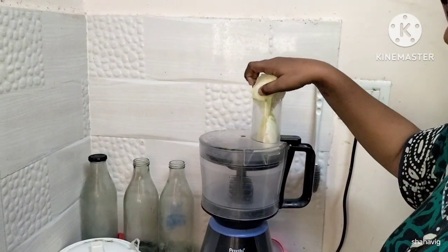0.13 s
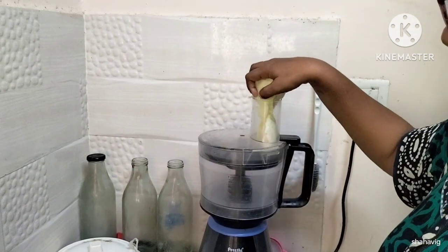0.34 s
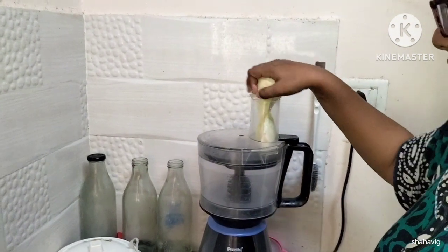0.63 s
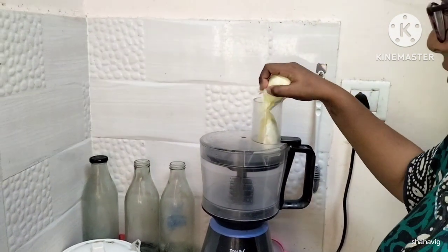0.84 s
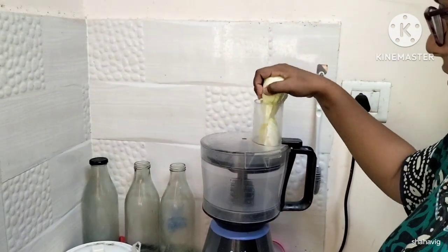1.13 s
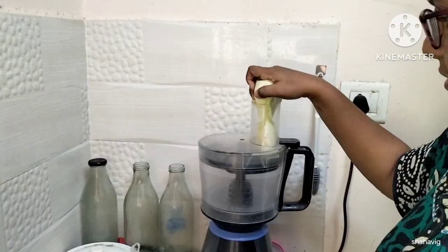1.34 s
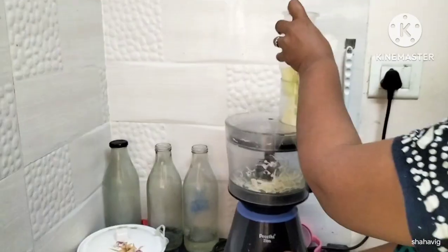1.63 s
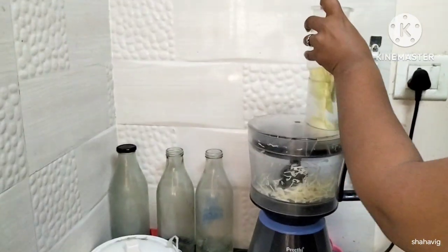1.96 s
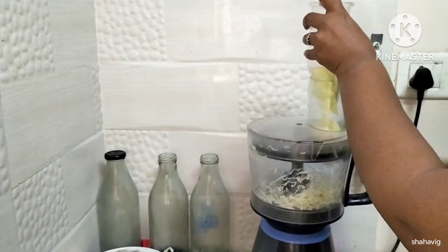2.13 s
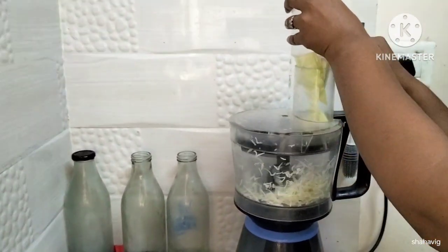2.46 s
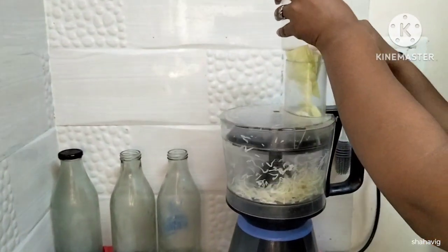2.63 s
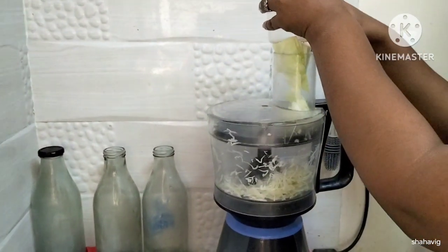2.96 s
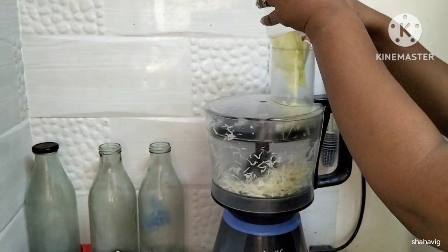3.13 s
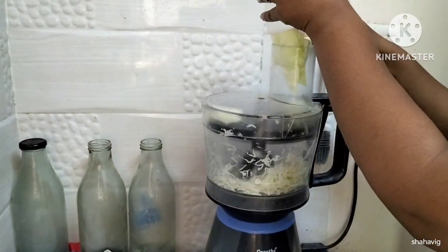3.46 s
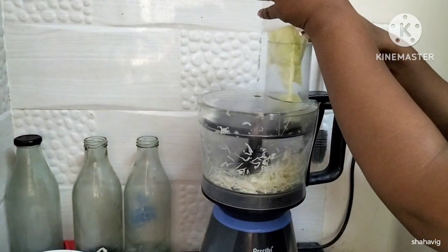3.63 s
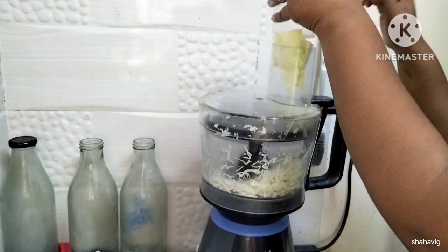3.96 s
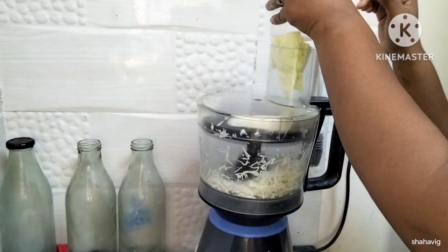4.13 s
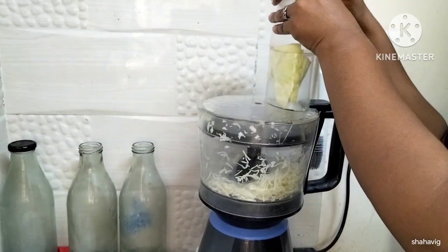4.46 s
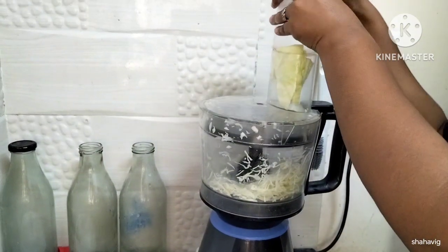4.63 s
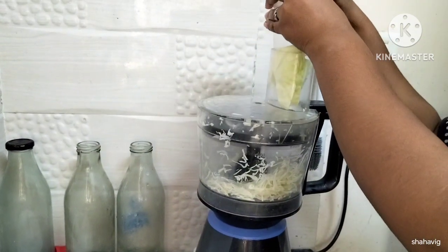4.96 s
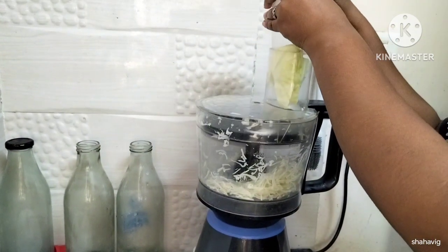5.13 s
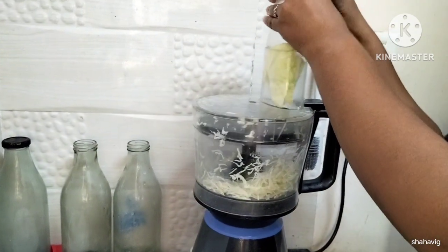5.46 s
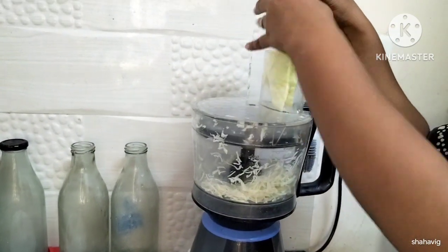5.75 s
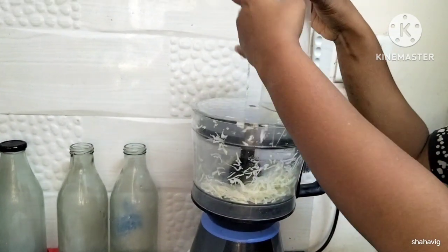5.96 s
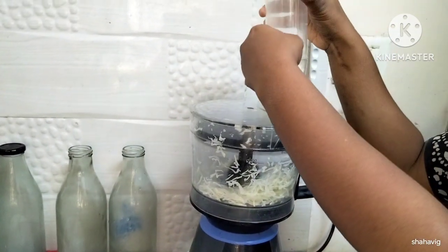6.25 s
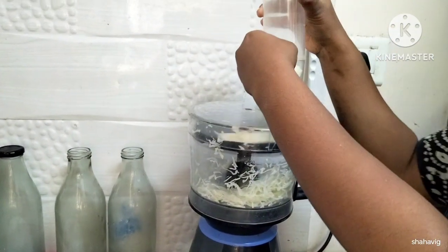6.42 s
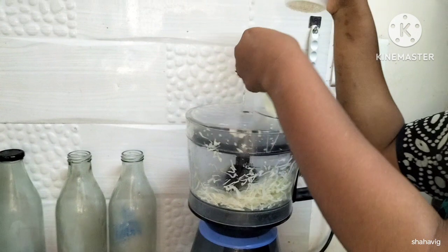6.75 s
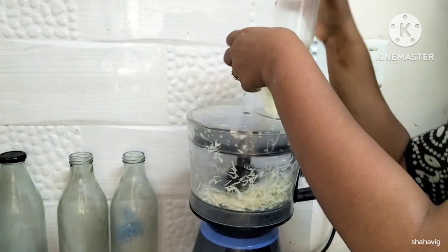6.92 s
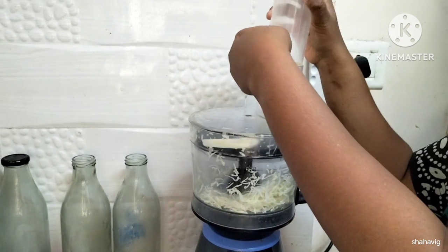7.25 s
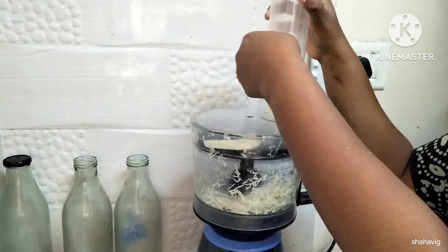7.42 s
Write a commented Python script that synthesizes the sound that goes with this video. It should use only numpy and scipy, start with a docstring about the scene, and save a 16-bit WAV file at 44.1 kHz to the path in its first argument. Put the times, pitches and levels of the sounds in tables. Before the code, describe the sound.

A close, mono kitchen scene with hard tiled walls and a faint dull room murmur. From 0 to 1.2 s there are only quiet handling sounds: brief crackly rubs of cabbage in a plastic feed tube, soft low bumps on the counter and light taps on the bowl. Around 1.3 s a stronger rub and a quick flurry of ringing plastic clacks. At 1.5 s the food processor cuts in abruptly with sharp clicks and a bright housing ring, far louder, its pitch creeping up slightly over the next couple of seconds. It then holds a high, slightly wavering whine around 2.6 kHz over fan air and harsh, rapidly pulsing gear hiss. Crisp shredding thickens at about 1.7-2, 2.6-3.2, 3.7-4.5, 5-5.8 and 7.2 s. Dull thuds come near 4.1 and, fainter, 6.5 s; the noise dips briefly near 6.2 s. The motor is still running at the end, about 7.6 s.

```python
"""Food processor shredding cabbage

Mono, close by, on a tiled kitchen counter. Cabbage rubs and bumps in the plastic feed tube (coloured grains
and noise), plastic clacks (struck modes), then the running motor is heard abruptly and creeps up to speed.
It whines on multiples of its shaft rate (sines) over fan air and gear hiss (shaped noise),
a ringing housing (moving resonance) and shredding leaves (grains).
"""
import sys
import numpy as np
from scipy import signal
from scipy.fft import rfft, irfft, next_fast_len
from scipy.io import wavfile

SR = 44100
rng = np.random.default_rng(int(sys.argv[2]) if len(sys.argv) > 2 else 0)


def unload_audio(sound):
    """Save the sound as a 16-bit wav file, at the path given as the first command line argument."""
    columns = np.transpose(np.atleast_2d(sound))
    # keep every value between -1 and 1, then stretch to whole-number steps
    steps = np.round(np.clip(columns, -1, 1) * 32767)
    wavfile.write(sys.argv[1], SR, steps.astype(np.int16))


N = 334719
TIME_S = np.arange(N) / SR

# Room murmur spectrum: (frequency [Hz], relative level [dB])
ROOM_SPECTRUM = [(20, -38), (40, -27), (65, -14), (95, -7.5), (140, -6), (310, 3.5), (380, -1), (900, -1.5),
                 (1700, -7), (3900, -10), (6500, -22.5), (8000, -42), (12000, -46), (15000, -48)]
ROOM_DB = -52
CUTOFF_HZ = 15500

# Cabbage rub spectrum: (frequency [Hz], relative level [dB])
RUB_SPECTRUM = [(1000, -35), (2000, -13.5), (2900, -5), (4200, -3), (5800, -7), (6900, -15.5), (8000, -31),
                (9500, -36), (12000, -34), (15000, -40)]
# Feed tube resonances: (frequency [Hz], width [Hz], lift [dB])
TUBE_MODES = [(2270, 80, 6), (3080, 82, 3), (3550, 120, 4.3), (4100, 130, 8.5), (4570, 130, 4.3),
              (11900, 400, 9)]
# Strokes of cabbage in the tube: (start [s], length [s], strength [dB])
RUB_STROKES = [(0.01, .03, -57), (0.077, 0.029, -50), (0.224, 0.052, -48.5), (0.282, 0.053, -49),
               (0.436, 0.04, -55), (0.647, 0.091, -55), (0.804, .13, -54.5), (1.115, .04, -59),
               (1.271, 0.036, -39.5), (1.35, .15, -53.5)]
RUB_ATTACK_S, RUB_RELEASE_S = 0.01, 0.023  # time constants
# Soft bumps on the counter: (time [s], strength [dB], decay [s])
BUMPS = [(.10, -49, 0.033), (.25, -44, 0.049), (.3, -46, .03), (.475, -41, .012), (1.38, -47, 0.013)]
# Plastic clacks: (time [s], strength [dB], decay [s])
CLACKS = [(1.277, -41, 0.014), (1.291, -46, 0.016), (1.367, -56, .02), (1.44, -54, .025)]
# Clack and tap spectrum: (frequency [Hz], relative level [dB])
CLACK_SPECTRUM = [(470, -40), (1100, 1), (1500, -25), (2050, -18), (2500, -2), (4000, -6), (6800, -20),
                  (8000, -28), (9500, -35), (12000, -34), (15000, -35)]
# Plastic bowl modes: (frequency [Hz], relative level [dB], t60 [s])
BOWL_MODES = [(1060, -7, .15), (2220, 2, .14), (3200, -9, .14), (3555, 2, .16), (3830, -4, .13),
              (4150, -2, 0.09), (4820, -3, .09), (5230, -6, .14), (6850, -10, 0.11), (12100, -26, .1)]
# Light taps on the bowl: (time [s], strength [dB], decay [s], resonance [Hz])
TAPS = [(.035, -44, .014, 4120), (.221, -44, 0.011, 4780), (.247, -45, .012, 4700),
        (.578, -45.5, 0.011, 2300), (.823, -48, .008, 3500)]

# Motor speed: (time [s], shaft rate [turns/s])
SHAFT_SPEED = [(1.5, 82.18), (1.75, 84.02), (2.1, 85.1), (2.5, 85.6), (2.8, 86.18), (3.3, 86.7),
               (4.1, 87.06), (4.85, 87.32), (5.4, 86.98), (5.9, 87.26), (6.2, 87.08), (6.6, 87.42),
               (7.0, 87.15), (7.59, 87.26)]
ONSET_S = 1.5012
# Sharp clicks around the abrupt onset: (time [s], height before the low-pass [full scale])
ONSET_CLICKS = [(1.5012, 0.17), (1.5053, 0.18), (1.526, 0.2)]
# Extra housing ring just after the onset, and the time constant of its dying away
EARLY_RING_DB, SETTLE_S = 9.5, .14
# Slow change of the running noise: (time [s], relative level [dB])
NOISE_LEVEL = [(1.5, -2.5), (1.8, 0), (3.2, 1), (4.1, 0.67), (4.7, -0.1), (5.8, -0.1), (6.6, 0.3),
               (7.59, 0.5)]
# Brief dip of the running noise
DIP_START_S, DIP_LENGTH_S, DIP_EDGE_S, DIP_DB = 6.165, 0.14, .022, -4.5
# Base levels, before the slow change and dip
AIR_DB, HISS_DB, RING_DB = -31, -20.5, -28
# Fan air spectrum: (frequency [Hz], relative level [dB])
AIR_SPECTRUM = [(15, -48), (30, -51), (80, -31.5), (150, -18), (225, -13), (264, -6), (346, -10.5),
                (452, -6.5), (735, -6), (830, -3.5), (1220, -2), (1940, -5), (2200, 2.5), (2900, -39)]
# Base resonances in the air noise: (frequency [Hz], width [Hz], lift [dB])
BASE_MODES = [(149, 7.3, 2.5), (215, 12, 6), (242, 13.4, -15.5), (290, 59, 8.5), (475, 50, 5.5),
              (926, 130, 5.5), (1170, 46, -6.5), (1738, 51, 7.5)]
# Gear hiss spectrum: (frequency [Hz], relative level [dB])
HISS_SPECTRUM = [(300, -60), (1500, -41), (2100, -10.5), (2450, 3.5), (2900, 3), (3500, 3), (3900, -0.6),
                 (5300, 0.1), (5800, -1), (6700, -2.5), (7300, -11.5), (8000, -25), (9300, -40.5),
                 (10200, -33.5), (13000, -34), (15500, -44)]
# Hiss resonances: (frequency [Hz], width [Hz], lift [dB])
HISS_MODES = [(2378, 25, 10), (3530, 70, 2), (4140, 49, 4), (4516, 110, 3.5), (4890, 41, 2.5),
              (5300, 120, 3.5), (6090, 55, 5), (6400, 60, -2), (6710, 100, 2), (11920, 540, 12.5)]
# Housing resonance: (time [s], centre [Hz])
HOUSING_PITCH = [(1.5, 2520), (2.6, 2500), (3.3, 2584), (3.9, 2650), (5.0, 2670), (6.0, 2563), (7.59, 2530)]
# Chunks thudding on the bowl: (time [s], strength [dB], decay [s])
THUDS = [(4.06, -39, 0.046), (6.47, -44.5, .08)]
# Shredding spectrum: (frequency [Hz], relative level [dB])
SHRED_SPECTRUM = [(300, -65), (1500, -39), (2400, -7.5), (3200, -2), (3900, -7.5), (6500, -9), (8500, -57),
                  (15000, -60)]
# Spells of the disc biting into cabbage: (start [s], length [s], level [dB])
BITES = [(1.66, .36, -31.5), (2.598, 0.64, -31.5), (3.722, 0.8, -32), (5.0, .78, -31), (7.24, .35, -32.5)]
BITE_EDGE_S, LOOSE_SHREDS_DB = 0.025, -39
# Tones of shaft, fan, gears, bearings: (multiple of shaft rate, level [dB], slow wander [dB])
TONES = [(3, -48.5, 3), (9, -51, 1), (12, -48, 1.5), (19.29, -50, 2), (22.28, -46.5, 2), (32, -41, 2),
         (38.57, -43, 2.5), (41.35, -45, 2), (44.1, -42.5, 2), (47.55, -46, 2), (51.8, -46, 2),
         (56.1, -44, 2), (58, -46, 2), (61.78, -44.5, 2), (69.4, -46, 2.5), (76.85, -48, 2)]
# Main whine
WHINE_ORDER, WHINE_DB, WHINE_WANDER_DB = 30, -26.5, 1.5
# Side tones one shaft rate away: the balance levels them off near these, then they wander
LOWER_NEAR_DB, UPPER_NEAR_DB = -26.5, -28
# Side tone balance: (time [s], lower over upper [dB])
SIDE_BALANCE = [(1.5, -5), (1.9, -6), (2.1, 10), (2.55, 15), (3.25, 10), (3.65, -14), (4.3, -12), (5.3, -1),
                (6.25, 9), (6.7, -13), (7.2, 1), (7.59, 2)]
# Tones swelling or fading: (multiple of shaft rate, start [s], length [s], change [dB])
SWELLS = [(12, 1.42, 0.54, 14.5), (30, 2.17, 0.89, -13), (9, 2.7, 5, 12), (30, 3.13, 1.1, -8),
          (12, 3.07, 1.25, 8.5), (69.4, 3.5, .75, 13.5), (38.57, 4.2, .5, 11), (32.1, 3.6, 3.6, 3),
          (38.57, 4.9, 0.88, 7), (69.4, 4.6, .9, 7), (30, 5.6, 1.28, 2.5), (3, 6.3, 1.16, 4.5)]
SWELL_EDGE_S = 0.044
BEARING_SLIP_RAD = .014


def from_db(db):
    """Decibels to gain."""
    return 10 ** (np.asarray(db) / 20)


def rms_one(x):
    """Scale to unit rms."""
    return x / np.sqrt(np.mean(x ** 2) + 1e-20)


def in_time(rows):
    """Interpolate a (time, value) curve at every sample."""
    times_s, values = np.transpose(rows)
    return np.interp(TIME_S, times_s, values)


def drift(rate_hz):
    """Random line of unit rms through rate_hz knots a second."""
    knots = rng.standard_normal(4096)
    return rms_one(np.interp(TIME_S * rate_hz, np.arange(len(knots)), knots))


def noise():
    """White noise."""
    return rng.standard_normal(N)


def grains(per_s, spread_db):
    """Random single-sample snaps of uneven size and either sign."""
    sizes = from_db(spread_db * np.minimum(rng.exponential(1, N), 4))
    present = rng.random(N) < per_s / SR
    return present * sizes * rng.choice([-1, 1], N)


def colour(x, spectrum, modes=()):
    """Filter x by a broad spectrum with resonances on it; unit rms."""
    size = next_fast_len(N)
    hz = np.maximum(np.arange(size // 2 + 1) * SR / size, 1)
    points_hz, levels_db = np.transpose(spectrum)
    gain_db = np.interp(np.log(hz), np.log(points_hz), levels_db)
    for centre_hz, width_hz, lift_db in modes:
        gain_db = gain_db + lift_db / (1 + (2 * (hz - centre_hz) / width_hz) ** 2)
    return rms_one(irfft(rfft(x, size) * from_db(gain_db), size)[:N])


def blows(rows, rise_s):
    """Summed envelopes of blows that swell quickly and die away."""
    envelope = np.zeros(N)
    for start_s, db, decay_s in rows:
        age_s = np.maximum(TIME_S - start_s, 0)
        envelope += from_db(db) * (1 - np.exp(-age_s / rise_s)) * np.exp(-age_s / decay_s)
    return envelope


def held(start_s, length_s, attack_s, release_s):
    """Envelope that rises, holds for its length and dies away."""
    age_s = np.maximum(TIME_S - start_s, 0)
    release = np.exp(-np.maximum(age_s - length_s, 0) / release_s)
    return (1 - np.exp(-age_s / attack_s)) * release


def spells(rows, attack_s, release_s):
    """Summed held envelopes of (start, length, dB) rows."""
    return sum(from_db(db) * held(s, length_s, attack_s, release_s) for s, length_s, db in rows)


def kitchen(x, t60_s, wet_db):
    """Close tiled walls add a short, dense tail that ripples the spectrum."""
    age_s = TIME_S[:SR // 4]
    tail = rng.standard_normal(len(age_s)) * from_db(-60 * age_s / t60_s)
    wet = from_db(wet_db)
    response = wet * tail / np.sqrt(np.sum(tail ** 2))
    response[0] += 1  # direct sound
    return signal.fftconvolve(x, response)[:N] / np.sqrt(1 + wet ** 2)


def bowl(x):
    """Struck bowl rings on in decaying modes; broad noise passes at about its own level."""
    age_s = TIME_S[:SR // 4]
    response = np.zeros(len(age_s))
    for hz, db, t60_s in BOWL_MODES:
        response += from_db(db - 60 * age_s / t60_s) * np.sin(2 * np.pi * hz * age_s)
    return signal.fftconvolve(x, response / np.sqrt(np.sum(response ** 2)))[:N]


def room_murmur():
    """Dull steady noise of the room."""
    modes = [(310, 48, 5.9), (1350, 250, 3), (1950, 500, -4)]
    return from_db(ROOM_DB) * colour(noise(), ROOM_SPECTRUM, modes)


def rubbing():
    """Leaves rub in the tube: strokes of crackle coloured by its resonances."""
    crackle = kitchen(grains(per_s=760, spread_db=3.0), t60_s=0.18, wet_db=3.0)
    strokes = spells(RUB_STROKES, RUB_ATTACK_S, RUB_RELEASE_S)
    return strokes * from_db(2.2 * drift(110)) * colour(crackle, RUB_SPECTRUM, TUBE_MODES)


def bumping():
    """The base bumps softly on the counter: short low noise bursts."""
    spectrum = [(60, -35), (165, -8), (290, 1), (450, -15), (1200, -19), (4000, -56)]
    return blows(BUMPS, rise_s=0.0034) * colour(noise(), spectrum)


def clacking():
    """A quick flurry of plastic contacts sets the bowl ringing."""
    force = blows(CLACKS, rise_s=0.0018)
    contacts = rms_one(grains(per_s=5000, spread_db=2.0))
    direct = from_db(-5) * force * colour(contacts, CLACK_SPECTRUM)
    return direct + from_db(5.0) * bowl(force * contacts)


def tapping():
    """Light taps on the bowl: noise bursts, each with one strong resonance."""
    out = np.zeros(N)
    for start_s, db, decay_s, hz in TAPS:
        envelope = blows([(start_s, db, decay_s)], rise_s=0.00084)
        out += envelope * colour(noise(), CLACK_SPECTRUM, [(hz, 350, 21)])
    return out


def fan_air(noise_db):
    """Fan turbulence: noise coloured by the base resonances."""
    level_db = AIR_DB + noise_db + 0.64 * drift(14)
    return from_db(level_db) * colour(noise(), AIR_SPECTRUM, BASE_MODES)


def gear_hiss(disc_angle, noise_db):
    """The geared-down disc runs a little out of true, so the hiss pulses once per disc turn."""
    pulse = from_db(0.48 * np.cos(disc_angle) + .5 * drift(40))
    pulsed = kitchen(noise(), t60_s=0.13, wet_db=-5.5) * pulse
    return from_db(HISS_DB + noise_db) * colour(pulsed, HISS_SPECTRUM, HISS_MODES)


def housing(angle, width_hz, throb):
    """Gear chatter, strongest once a shaft turn, rings a narrow moving resonance; unit rms."""
    radius = np.exp(-np.pi * width_hz / SR)
    carrier = np.exp(2j * np.pi * np.cumsum(in_time(HOUSING_PITCH)) / SR)
    chatter = noise() * (1 + throb * np.cos(angle))
    # double pole at 0 Hz, shifted to the moving centre
    baseband = signal.lfilter([1], [1, -2 * radius, radius ** 2], chatter / carrier)
    return rms_one(np.real(baseband * carrier))


def housing_ring(angle, noise_db):
    """Ringing housing, louder just after the onset."""
    early = np.exp(-np.maximum(TIME_S - ONSET_S, 0) / SETTLE_S)
    level_db = RING_DB + noise_db + EARLY_RING_DB * early + 1.4 * drift(30)
    return from_db(level_db) * housing(angle, width_hz=300, throb=0.25)


def thudding():
    """Chunks thud against the bowl: low noise bursts."""
    spectrum = [(40, -40), (90, -16), (145, 0), (260, -4), (800, -38)]
    return blows(THUDS, rise_s=.008) * colour(noise(), spectrum)


def shredding(disc_angle):
    """Leaves snap as the blades sweep under the tube, densest once per disc turn."""
    snaps = grains(per_s=5000 * (1 + .5 * np.cos(disc_angle)), spread_db=1.2)
    biting = spells(BITES, BITE_EDGE_S, BITE_EDGE_S)
    level = np.hypot(biting, from_db(LOOSE_SHREDS_DB))
    return level * from_db(2.0 * drift(24)) * colour(snaps, SHRED_SPECTRUM)


def whine(angle):
    """Tones on multiples of the shaft rate; fractional ones come from the bearings and slip in phase."""
    balance_db = in_time(SIDE_BALANCE)
    lower_db = LOWER_NEAR_DB - 20 * np.log10(np.hypot(1, from_db(-balance_db)))
    upper_db = UPPER_NEAR_DB - 20 * np.log10(np.hypot(1, from_db(balance_db)))
    main = [(WHINE_ORDER - 1, lower_db, WHINE_WANDER_DB),
            (WHINE_ORDER, WHINE_DB, WHINE_WANDER_DB),
            (WHINE_ORDER + 1, upper_db, WHINE_WANDER_DB)]
    out = np.zeros(N)
    for order, db, wander_db in main + list(TONES):
        level_db = db + wander_db * drift(5)
        for swell_order, start_s, length_s, change_db in SWELLS:
            if abs(swell_order - order) < .5:
                level_db = level_db + change_db * held(start_s, length_s, SWELL_EDGE_S, SWELL_EDGE_S)
        source_angle = angle + BEARING_SLIP_RAD * drift(45) if order % 1 else angle
        phase = order * source_angle + rng.uniform(0, 2 * np.pi)
        out += from_db(level_db) * np.sin(phase)
    return np.sqrt(2) * out  # levels are rms


def handling():
    """Sounds of cabbage, base and bowl being handled."""
    return rubbing() + bumping() + clacking() + tapping()


def processor():
    """Running machine: whine, hiss pulse, housing throb and shredding follow one shaft."""
    angle = 2 * np.pi * np.cumsum(in_time(SHAFT_SPEED)) / SR
    disc_angle = angle / 3
    noise_db = in_time(NOISE_LEVEL) + 0.28 * drift(25)
    noise_db += DIP_DB * held(DIP_START_S, DIP_LENGTH_S, DIP_EDGE_S, DIP_EDGE_S)
    out = fan_air(noise_db) + gear_hiss(disc_angle, noise_db) + housing_ring(angle, noise_db)
    out += thudding() + shredding(disc_angle) + whine(angle + 0.004 * drift(40))
    out *= np.clip((TIME_S - ONSET_S) / 0.00046, 0, 1)  # silent before the onset
    for click_s, height in ONSET_CLICKS:
        out[round(click_s * SR)] += height
    return out


def scene():
    """Room, hands and machine, alike in both channels."""
    return np.tile(room_murmur() + handling() + processor(), (2, 1))


def record(dry):
    """Steep low-pass."""
    low_pass = signal.ellip(10, .1, 80, CUTOFF_HZ, fs=SR, output="sos")
    return signal.sosfilt(low_pass, dry)


dry = scene()
out = record(dry)
unload_audio(out)
```